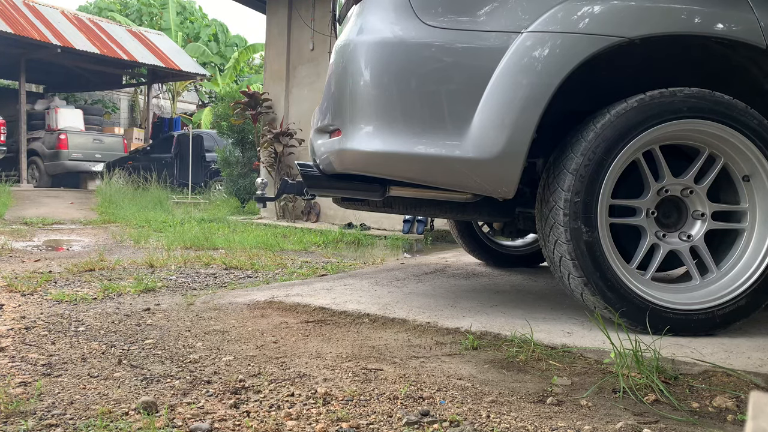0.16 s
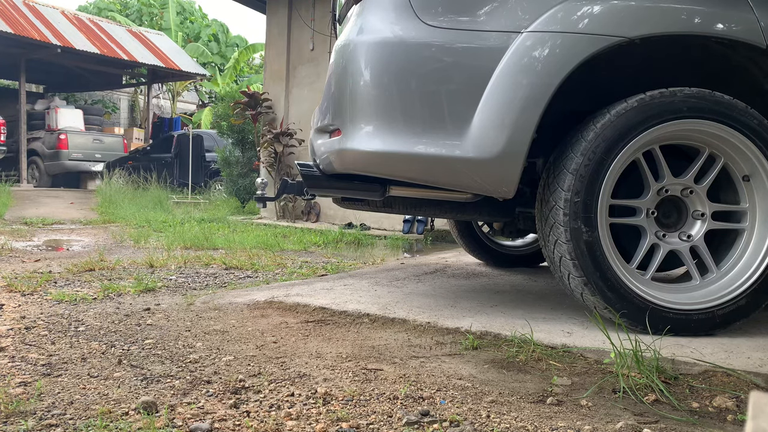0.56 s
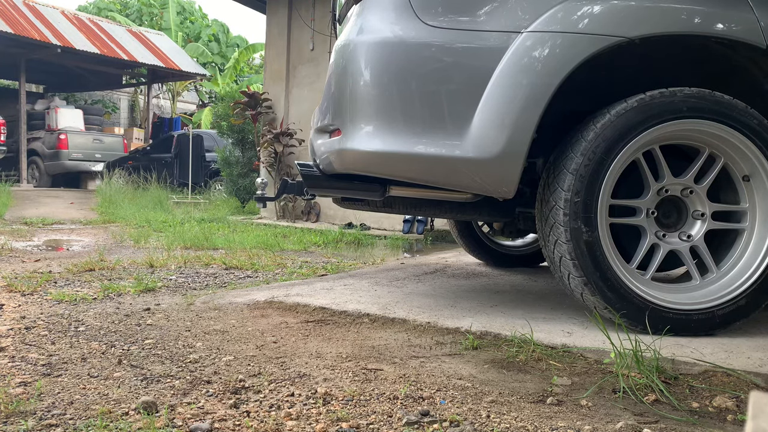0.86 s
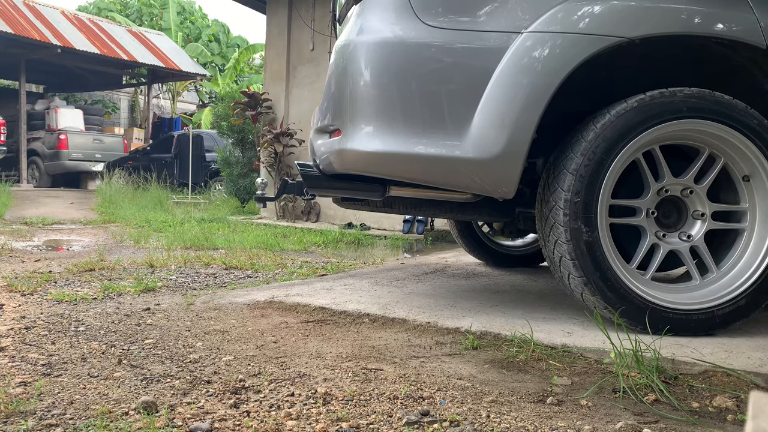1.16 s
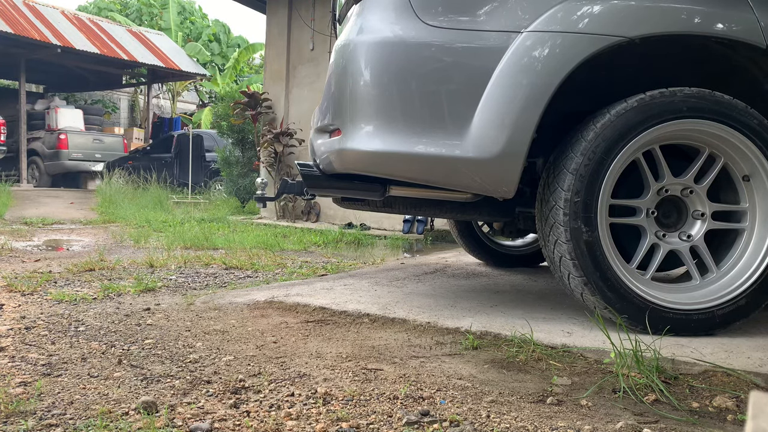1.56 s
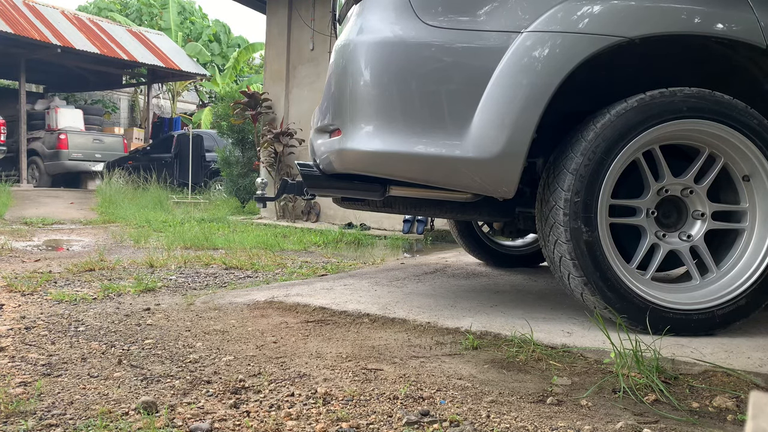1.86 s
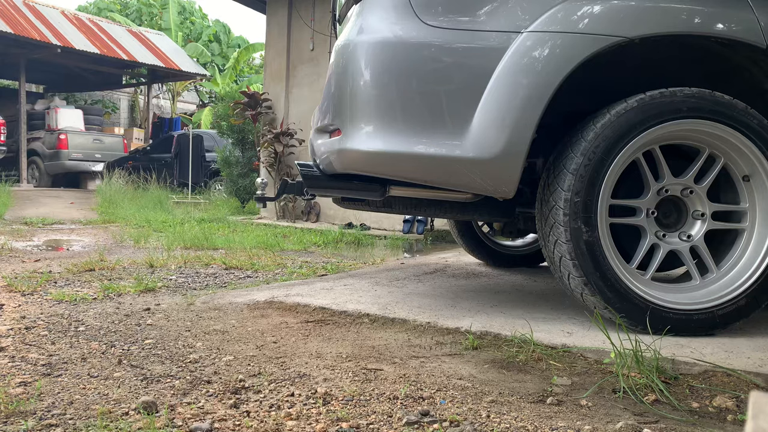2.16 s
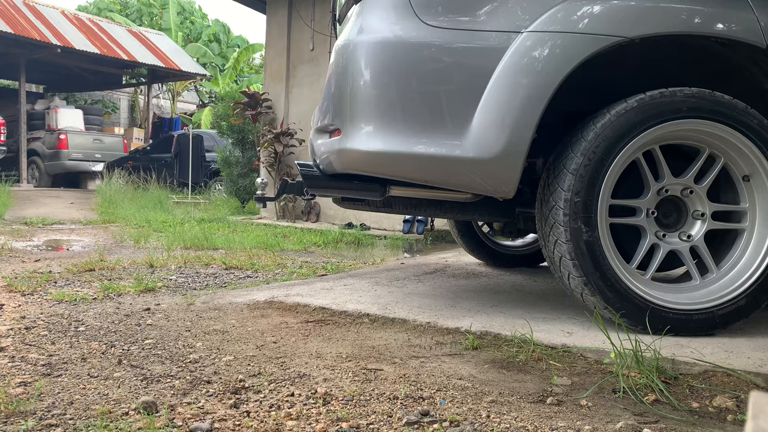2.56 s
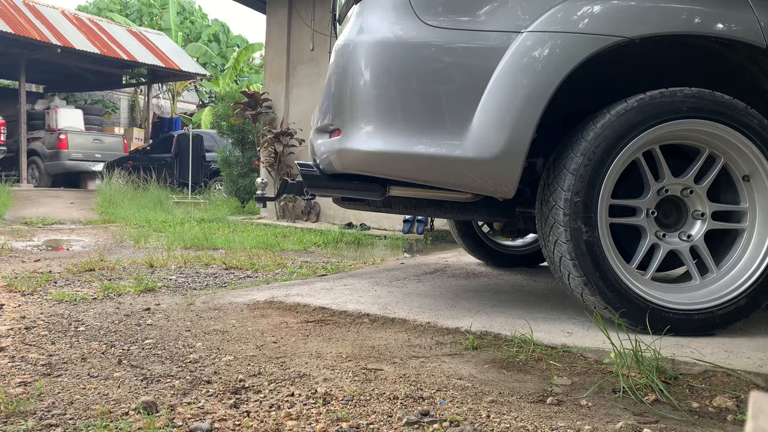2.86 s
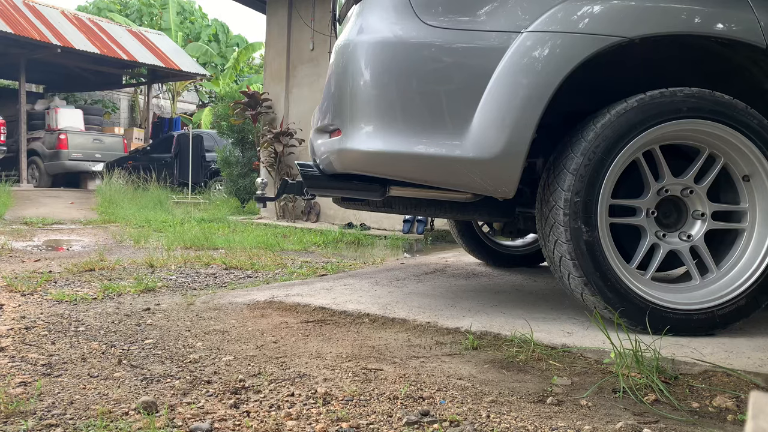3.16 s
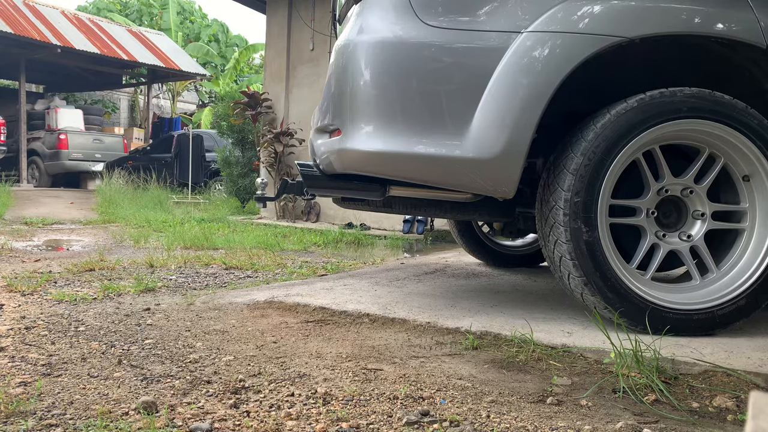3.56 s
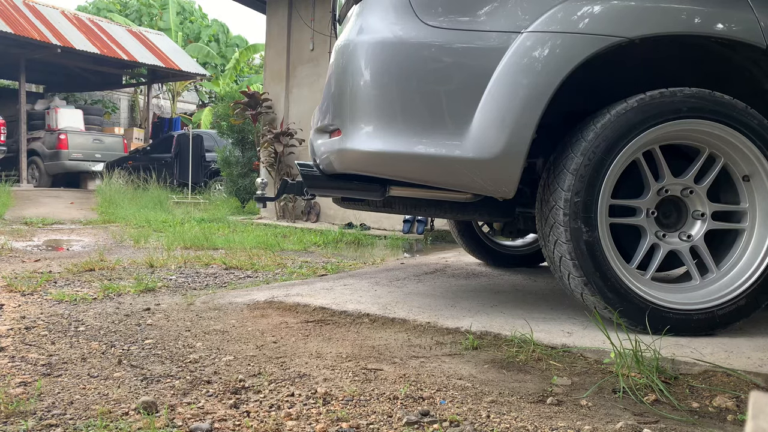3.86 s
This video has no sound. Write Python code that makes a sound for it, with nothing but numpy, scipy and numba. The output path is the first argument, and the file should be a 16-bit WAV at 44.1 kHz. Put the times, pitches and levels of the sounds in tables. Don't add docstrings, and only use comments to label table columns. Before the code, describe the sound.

A car engine is blipped twice, its loud exhaust and fluttering turbo howl falling to idle.

```python
import sys
import numpy as np
from scipy import signal
from scipy.fft import rfft, irfft
from scipy.io import wavfile
from scipy.ndimage import uniform_filter1d
from numba import njit

SR = 44100
rng = np.random.default_rng(int(sys.argv[2]) if len(sys.argv) > 2 else 0)


def digitize_waveform(pressure):
    field = np.atleast_2d(pressure).T
    bounded = np.clip(field, -1, 1)
    quanta = np.round(bounded * 32767).astype(np.int16)
    wavfile.write(sys.argv[1], SR, quanta)


def voltage_ratio(level):
    return 10 ** (np.asarray(level, float) / 20)


N = 176400

# time in seconds, firing rate in Hz, pulse level in dB, gas flow in dB, turbulence in dB.
ENGINE = [(0, 75.63, -5, -28, 10), (.16, 86.6, -1, -34, -10.5), (.21, 89.8, 2, -37, -7.5),
          (.25, 90.9, -15.5, -37, -2), (.29, 88.04, -8.5, -39.5, 0), (.5, 74.78, -14, -40.5, 0.5),
          (.83, 61.46, -16, -43.5, -4), (.875, 61, -30.5, -43, 21), (.91, 63.3, -13.5, -40.5, 0),
          (1.16, 86.07, -1, -35.5, -6), (1.34, 98.5, -7.5, -37, 3), (1.45, 94.7, -11.5, -37.5, 10.5),
          (1.75, 74, -14.5, -40.5, 9), (2.1, 57.56, -18.5, -45.5, 6), (2.2, 51.34, -21, -48, -1),
          (2.55, 38.44, -24.5, -55, -8.5), (2.9, 28.05, -33.5, -63, -6), (4, 27.82, -34.5, -69, -3)]
# time in seconds, shaft whirl in Hz, howl level in dB, blade whine in dB.
TURBO = [(0, 420, -57, -28), (.283, 594.3, -26, -51), (.291, 592.3, -16.5, -42), (.37, 538, -17, -39),
         (.56, 482.8, -19.5, -47), (.6, 475.4, -22, -51), (.64, 470, -17, -52), (.82, 422.2, -23.5, -55),
         (.87, 410.3, -32, -55), (1.1, 535.6, -45, -44), (1.36, 696, -34, -42), (1.368, 689, -15.5, -42),
         (1.45, 607, -19, -42), (1.6, 561, -18, -34), (1.8, 502.8, -19.5, -48), (2.3, 370.8, -22, -58),
         (2.7, 294, -24.5, -62), (3.0, 233.4, -33, -69), (3.2, 208.6, -44, -76), (4, 160, -95, -95) ]
# centre in Hz, width in Hz, level in dB.
PIPE = [(57.4, 32.5, -3.5), (124, 16.2, 10), (185, 133, -2.5), (239.2, 33.8, 6), (345, 88, -5.5),
        (445.5, 26, -3.5), (517, 142, -10), (652, 137, -15.5), (1032, 16, -17.5), (1405, 23, -43),
        (1657, 79, -10), (1930, 67, -32)]
# centre in Hz, width in Hz, level in dB.
IDLE_PIPE = [(58.3, 24, 4), (98, 28.4, 15), (137.2, 12.8, 15.5), (215.3, 33.4, 7.5), (313, 39, -14.5),
             (456, 92, -11)]
# centre in Hz, width in Hz, level in dB.
TAILPIPE = [(240, 40, 0), (320, 40, 0), (395, 40, -1), (448, 36, 0), (520, 45, 2), (600, 90, 0),
            (1050, 300, -4), (1380, 200, 0), (2000, 500, 0)]
CYLINDER_DB = [-1, -6.5, -4.5, -3]
# frequency in Hz, density in dB per Hz.
GAS = [(500, 15), (900, 0.5), (2100, 0), (3500, -13.5), (5500, -17.5), (8000, -14.5), (11500, -12),
       (16000, -18)]
# frequency in Hz, density in dB per Hz.
YARD = [(300, -40), (600, -7.5), (800, -9), (1700, -8), (2400, -15), (5000, -27.5), (10000, -26.5),
        (16000, -40.5)]
# frequency in Hz, likeness 0-1.
LIKENESS = [(250, 0.9), (600, 0.52), (1100, 0.06), (5500, 0.08), (8000, 0.7), (16000, 0.26)]
# ring in Hz, ring width in Hz, level in dB, time of one tick in seconds.
VALVES = [(1696, 70, -59.5, 3.585), (3500, 83, -69, 3.47), (3293, 69, -70, 3.52), (1018, 34, -59.5, 2.9),
          (1400, 48, -63, 3.44), (988, 48, -61, 3.52), (2020, 78, -60.5, 3.9)]
# time in seconds, rasp level in dB.
RASPS = [
    (.288, -38),
    (1.365, -26.5),
]


@njit
def svf(x, hz, width_hz):
    y, b, l = np.empty(len(x)), 0., 0.
    for i in range(len(x)):
        g, k = np.tan(np.pi * hz[i] / SR), width_hz[i] / hz[i]
        v = (b + g * (x[i] - l)) / (1 + g * (g + k))
        b, l, y[i] = 2 * v - b, l + 2 * g * v, k * v
    return y


def band(x, hz, width_hz):
    return svf(x, np.clip(hz + np.zeros(N), 20, .45 * SR), width_hz + np.zeros(N))


def lowpass(x, hz):
    return signal.sosfilt(signal.butter(3, hz, fs=SR, output="sos"), x)


def noise():
    return rng.standard_normal(N)


def unit(x):
    return x / np.sqrt(np.mean(x ** 2))


def curve(table, index):
    rows = np.array(table, float)
    return np.interp(np.arange(N) / SR, rows[:, 0], rows[:, index])


def walk(rate_hz):
    k = int(SR / rate_hz)
    steps = np.repeat(rng.standard_normal(N // k + 1), k)
    return unit(uniform_filter1d(uniform_filter1d(steps, k), k)[:N])


def colour(x, points):
    f, p = np.fft.rfftfreq(N, 1 / SR) + 1, np.array(points, float)
    return irfft(rfft(x) * voltage_ratio(np.interp(np.log(f), np.log(p[:, 0]), p[:, 1])), N)


def drop(x, gaps):
    f = np.fft.rfftfreq(2 * N, 1 / SR)
    removed = sum((f > lo) & (f < hi) for lo, hi in gaps)
    return irfft(rfft(x, 2 * N) * (1 - removed))[:N]


def pipe(x, modes, flip):
    return sum((-1) ** (k * flip) * voltage_ratio(db) * band(x, f, w) for k, (f, w, db) in enumerate(modes))


def ports(make):
    lag_s, zero_hz = 2.06e-4, 1300
    f, p = np.fft.rfftfreq(N, 1 / SR), np.array(LIKENESS)
    like = np.clip(np.interp(f, p[:, 0], p[:, 1]), 0, 1)
    shared = rfft(make())
    turn = np.exp(1j * np.pi * np.maximum(f - zero_hz, 0) * lag_s)
    return np.array([irfft(np.sqrt(like) * shared * s + np.sqrt(1 - like) * rfft(make()), N)
                     for s in (1 / turn, turn)])


def firings(hz):
    jitter, scatter_db, idle_scatter_db = .006, .7, 1.6
    turns = np.cumsum(hz * (1 + jitter * walk(25))) / SR
    at = np.flatnonzero(np.diff(np.floor(turns))) + 1
    spread_db = scatter_db + idle_scatter_db * np.clip(2 - hz[at] / 30, 0, 1)
    size = voltage_ratio(np.resize(CYLINDER_DB, len(at)) + spread_db * rng.standard_normal(len(at)))
    clicks = np.zeros(N)
    clicks[at] = size * np.sqrt(SR / hz[at])
    return clicks, turns % 1


def load():
    full_climb_hz_per_s = 132
    climb = uniform_filter1d(np.gradient(curve(ENGINE, index=1)) * SR, size=2000)
    return np.clip(climb / full_climb_hz_per_s, 0, 1)


def baffles(x):
    for delay_s in [.0047, .0083, .0131]:
        a = np.zeros(int(delay_s * SR) + 1)
        a[0], a[-1] = 1, -.6
        x = signal.lfilter(a[::-1], a, x)
    return x


def exhaust(clicks, phase):
    muffler_hz, loaded_muffler_hz, gas_top_hz, gas_low_hz = 420, 305, 934, 260
    pair_db, third_db, coast_first_db = -19, -24, -25
    boom_db_per_octave, idle_below_hz, idle_fade_hz = -8.5, 36, 5.7
    hz, throttle = curve(ENGINE, index=1), load()
    coast = .8 * np.clip(hz / 10 - 5, 0, 1)

    gas_db = np.minimum(curve(ENGINE, index=4), -1) - 8 * throttle
    gas = unit(np.exp(-phase / 0.49) * noise()) * voltage_ratio(gas_db)
    gas = lowpass(gas - .7 * band(gas, gas_low_hz / 3, gas_low_hz), gas_top_hz)
    pulses = (1 - throttle) * lowpass(clicks, muffler_hz) + throttle * lowpass(clicks, loaded_muffler_hz)
    soft = baffles(pulses) + gas

    soft = soft + coast * voltage_ratio(coast_first_db) * np.sin(2 * np.pi * phase)
    soft = soft + np.maximum(throttle, coast) * voltage_ratio(pair_db) * np.sin(4 * np.pi * phase)
    soft = soft + throttle * voltage_ratio(third_db) * np.sin(6 * np.pi * phase)

    boom = voltage_ratio(boom_db_per_octave * np.log2(hz / 60))
    hot = boom * pipe(soft, PIPE[:2], True) + pipe(soft, PIPE[2:], True)
    idle = np.clip((idle_below_hz - hz) / idle_fade_hz, 0, 1)
    return unit((1 - idle) * hot + idle * pipe(soft, IDLE_PIPE, True)) * voltage_ratio(curve(ENGINE, index=2))


def howl(phase):
    wander, flutter_db, chop = 0.0091, 2, 0.44
    overtone_db_per_octave, surge_db, surge_width_hz = 18.5, -17.5, 370
    hz = curve(TURBO, index=1)
    turn = 2 * np.pi * np.cumsum(hz * (1 + wander * walk(30.21))) / SR
    bright = voltage_ratio(overtone_db_per_octave * np.log2(hz / 650))
    tone = np.sin(turn)
    for order, db in [(2, -11), (3, -21)]:
        tone = tone + bright * voltage_ratio(db + 2.0 * walk(90)) * np.sin(order * turn + 2.66 * walk(70))
    tone = tone * (1 + chop * np.cos(2 * np.pi * phase)) * voltage_ratio(flutter_db * walk(20))
    surge = voltage_ratio(surge_db) * bright * unit(band(noise(), 2.6 * hz, surge_width_hz))
    return (unit(pipe(tone, TAILPIPE, False)) + surge) * voltage_ratio(curve(TURBO, index=2))


def hiss(phase):
    blades, duct_hz, duct_width_hz, duct_peak_db = 30.2, 15500, 1700, 3
    gas_db, whine_db, intake_db, intake_hz = 14.5, 1.5, 0.5, 3280
    flow_db, throttle = curve(ENGINE, index=3), load()
    hz = blades * curve(TURBO, index=1)
    duct_db = duct_peak_db / (1 + ((hz - duct_hz) / duct_width_hz) ** 2)
    width_hz = hz * (0.087 + 0.23 * duct_db / duct_peak_db)
    whine_gain = voltage_ratio(whine_db + duct_db + curve(TURBO, index=3) - flow_db)
    puff = (1 + np.exp(-phase / 0.77)) * voltage_ratio(0.44 * walk(15.2))

    def rush():
        gas = voltage_ratio(gas_db) * unit(colour(puff * noise(), GAS))
        whine = whine_gain * unit(band(band(noise(), hz, width_hz), hz, width_hz))
        intake = unit(band(band(noise(), intake_hz, 1300), intake_hz, 1200))
        return gas + whine + voltage_ratio(intake_db) * throttle * intake

    return ports(rush) * voltage_ratio(flow_db)


def yard():
    return ports(lambda: unit(colour(noise(), YARD))) * voltage_ratio(-50.5 + walk(10))


def valves():
    tick_s, scatter_db = 0.011, 3.5
    hz = curve(ENGINE, index=1)
    cycles, out = np.cumsum(hz) / SR / 4, 0
    for f, w, db, s in VALVES:
        since_s = (cycles - cycles[int(s * SR)]) % 1 * 4 / hz
        rattle = np.exp(-since_s / tick_s) * voltage_ratio(scatter_db * walk(8)) * noise()
        out = out + voltage_ratio(db) * unit(band(band(rattle, f, w), f, 2 * w))
    return out * np.array([[.6], [1]])


def rasp():
    hz, width_hz, decay_s, grain_db = 1870, 490, 0.13, 2.5
    t = np.arange(N) / SR
    shape = sum(voltage_ratio(db) * (t > s) * np.exp(-np.abs(t - s) / decay_s) for s, db in RASPS)

    def grain():
        rush = band(band(noise(), hz, width_hz), hz, 2 * width_hz)
        return unit(voltage_ratio(grain_db * walk(70)) * rush)

    return shape * ports(grain)


def bearing():
    order, level_db, from_s, to_s = 3.36, -53, 2.805, 3.72
    t = np.arange(N) / SR
    turn = 2 * np.pi * np.cumsum(order * curve(TURBO, index=1)) / SR
    heard = np.clip(np.minimum(t - from_s, to_s - t) * 10, 0, 1)
    return heard * voltage_ratio(level_db + 4 * walk(8.47)) * np.sin(turn + .4 * walk(29.3))


def scene():
    clicks, phase = firings(curve(ENGINE, index=1))
    tail = exhaust(clicks, phase) + howl(phase)
    echo = [np.roll(tail, int(lag_s * SR)) for lag_s in [.011, .017, .029, .037]]
    side = voltage_ratio(-4.5) * band(echo[0] - echo[1] + echo[2] - echo[3], 1110, 910)
    stereo = np.array([tail + side, tail - side])
    return stereo + hiss(phase) + yard() + valves() + rasp() + bearing()


def top_cut(x):
    return signal.sosfilt(signal.butter(12, 17100, fs=SR, output="sos"), x)


def record(dry):
    x = np.tanh(signal.sosfilt(signal.butter(2, 38, "high", fs=SR, output="sos"), dry))
    mid = drop((x[0] + x[1]) / 2, [(8150, 8950), (12650, 14000), (15850, SR)])
    side = drop((x[0] - x[1]) / 2, [(10400, 11700), (15250, SR)])
    return top_cut(np.array([mid + side, mid - side]))


dry = scene()
out = record(dry)
digitize_waveform(out)
```